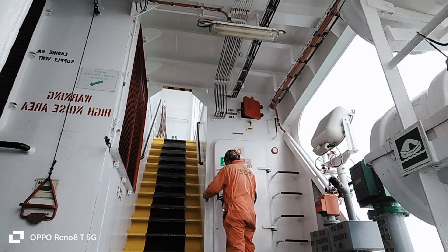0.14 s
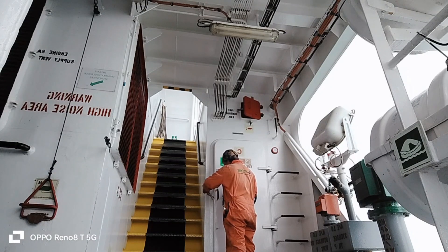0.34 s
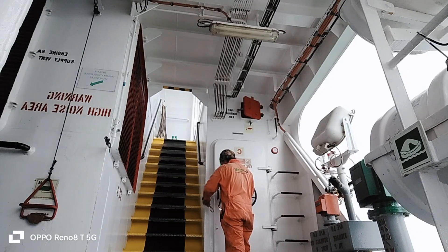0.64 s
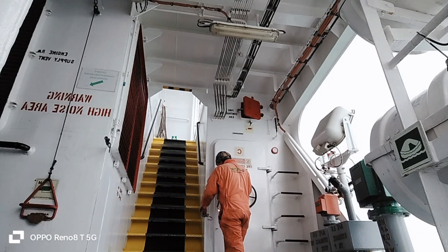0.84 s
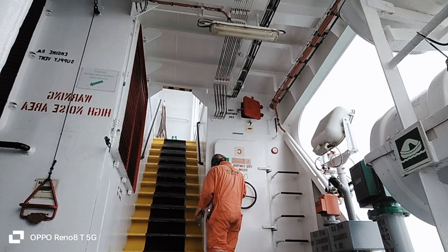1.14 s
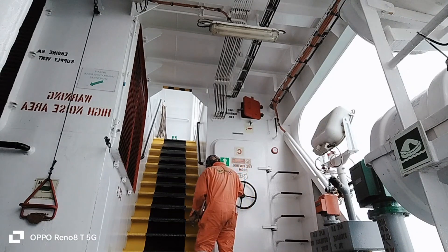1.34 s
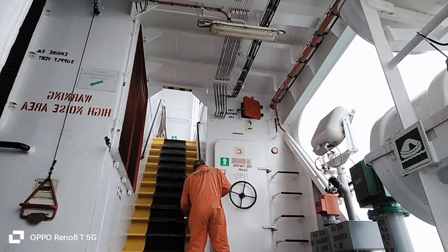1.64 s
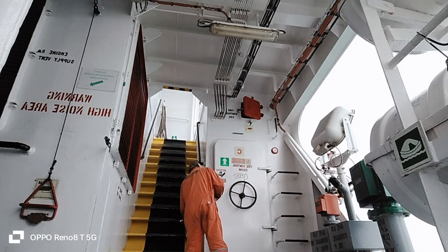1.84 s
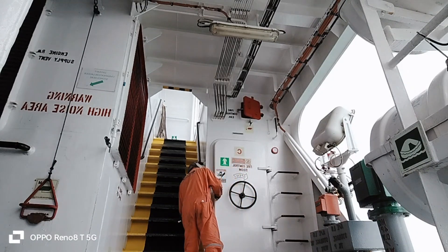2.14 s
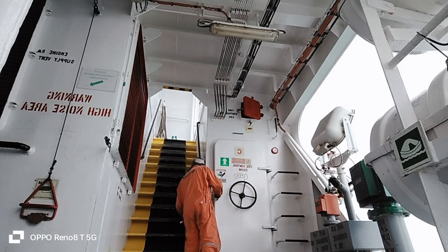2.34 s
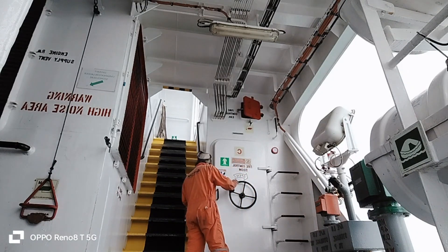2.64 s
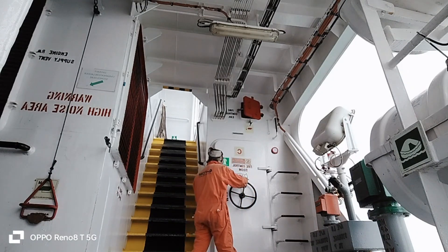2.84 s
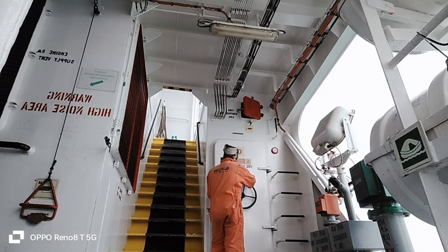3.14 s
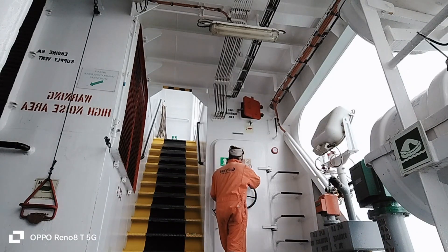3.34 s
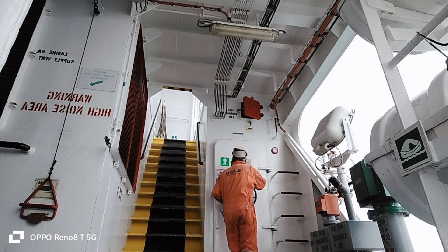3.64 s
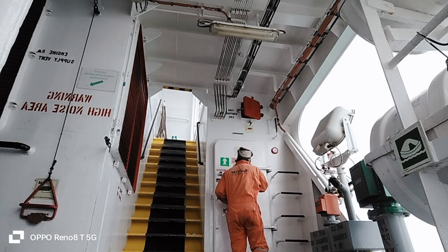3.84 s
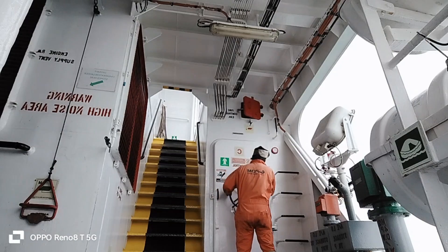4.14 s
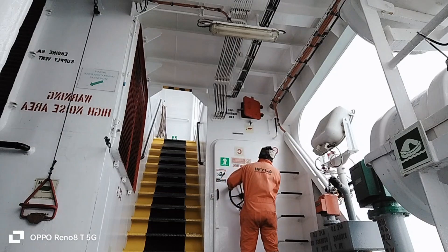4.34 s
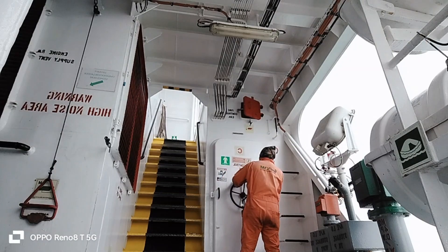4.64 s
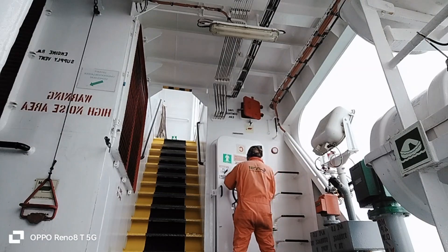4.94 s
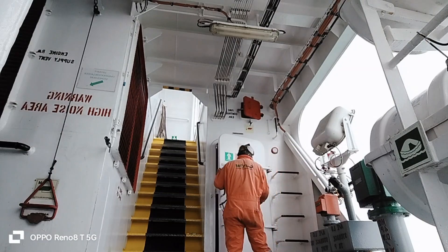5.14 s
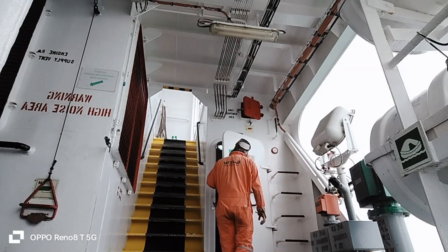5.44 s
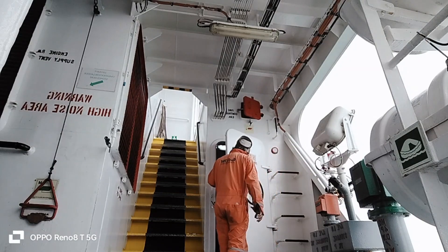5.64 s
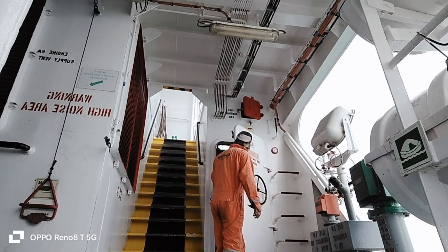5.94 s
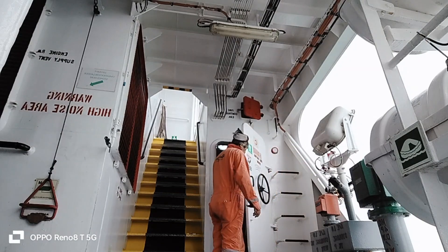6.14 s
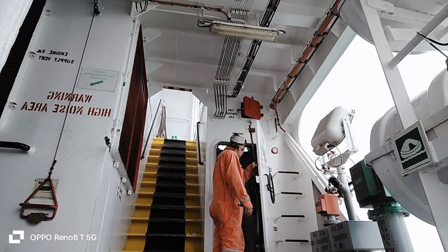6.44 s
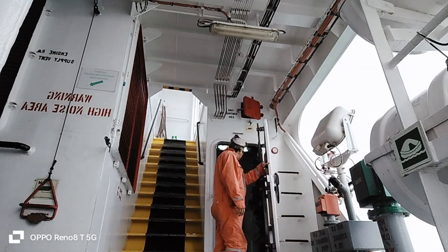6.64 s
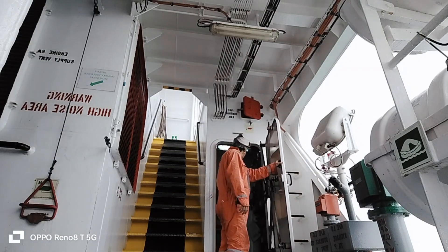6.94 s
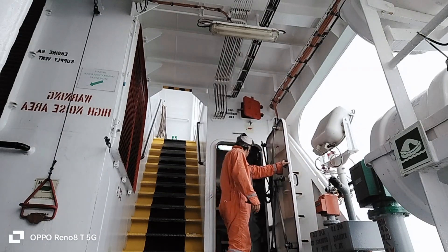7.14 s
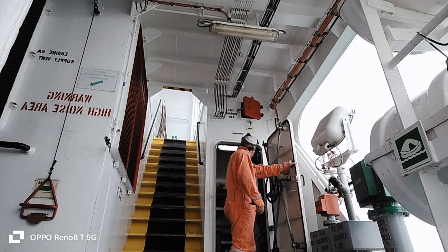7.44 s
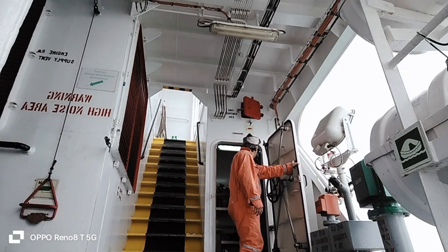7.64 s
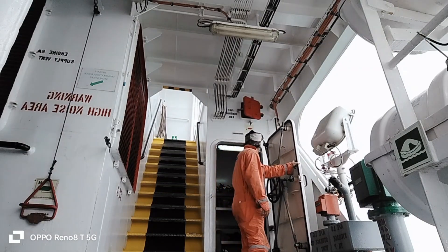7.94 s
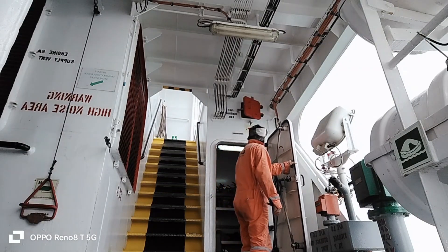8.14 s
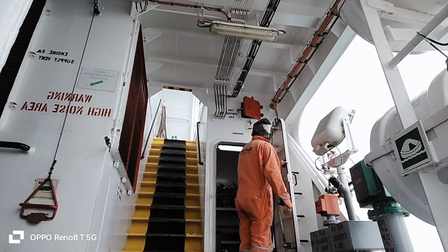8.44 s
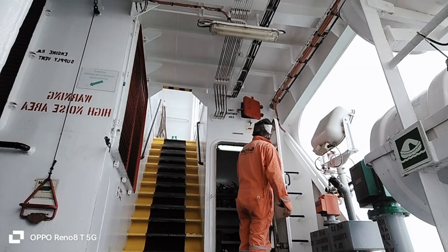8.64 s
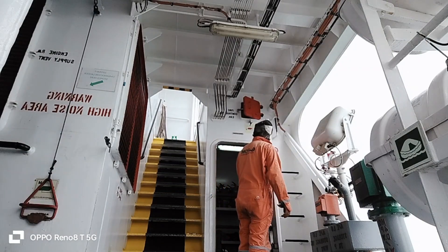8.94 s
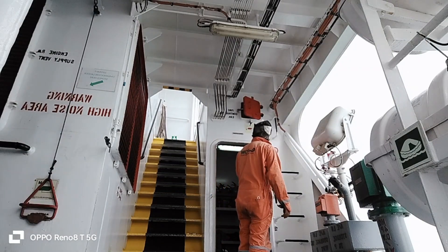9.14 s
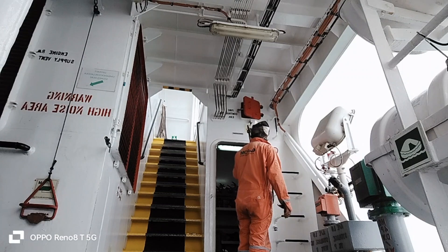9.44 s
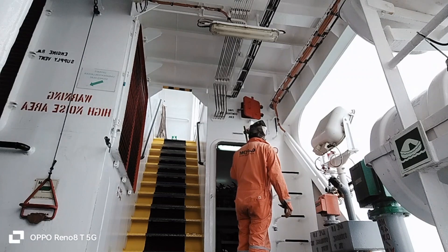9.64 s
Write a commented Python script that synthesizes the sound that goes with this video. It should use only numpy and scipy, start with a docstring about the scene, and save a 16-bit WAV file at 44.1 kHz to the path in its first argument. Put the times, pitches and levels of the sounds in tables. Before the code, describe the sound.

Low, throbbing ventilation noise fills a sheltered deck on a ship from start to finish. The hum surges unevenly several times a second over rumbling, softly ringing steel panels and hissing air. Near the middle, the wheel on a metal door clanks faintly twice in quick succession. Occasional dull bumps, like feet and door fittings, stay almost buried under the fan.

```python
"""A swelling, wavering drone with a gusty boom: a big supply fan roars on a covered steel ship deck.
Turbulence pumps the duct's lowest resonance and shakes its upper ones along. The blades hum steadily,
housing and deck rumble, casing panels ring and air rushes through the louvres. A door handwheel clanks
twice among faint bumps. A gain control leans back after each swell."""
import sys
import numpy as np
from scipy import signal
from scipy.fft import rfft, irfft, next_fast_len
from scipy.io import wavfile
from scipy.ndimage import uniform_filter1d

SR = 44100
rng = np.random.default_rng(int(sys.argv[2]) if len(sys.argv) > 2 else 0)


def transcribe(signal):
    """Save signal, clipped to [-1, 1], as a 16-bit WAV file at the path in sys.argv[1]."""
    frames = np.atleast_2d(signal).T
    limited = np.clip(frames, -1, 1)
    pcm = np.round(limited * 32767).astype(np.int16)
    wavfile.write(sys.argv[1], SR, pcm)


N = 431738


# Swells of the lowest duct resonance: (crest time [s], level [dB], pitch [Hz], rise [s], fall [s])
DRONE_SWELLS = [(0.03, -20, 124, 0.024, 0.08), (0.2, -17, 125.8, 0.075, 0.055),
                (0.41, -13.5, 122.9, 0.06, 0.052), (0.53, -27, 126.1, 0.035, 0.075),
                (0.66, -19.0, 124.4, 0.027, 0.051), (0.79, -6.5, 125.3, 0.035, 0.13),
                (0.93, -10.5, 122.3, 0.072, 0.092), (1.15, -13.5, 124.6, 0.19, 0.043),
                (1.33, -13, 124.9, 0.05, 0.13), (1.5, -12, 125.4, 0.22, 0.053),
                (1.6, -19.5, 121, 0.059, 0.045), (1.71, -22, 123.7, 0.043, 0.037),
                (1.82, -17.0, 124.7, 0.065, 0.048), (1.92, -25, 120.3, 0.044, 0.027),
                (2.03, -26, 127.6, 0.041, 0.034), (2.11, -17, 125.1, 0.032, 0.053),
                (2.28, -16.0, 121.2, 0.071, 0.11), (2.43, -15.5, 125.1, 0.068, 0.11),
                (2.76, -10.5, 125.7, 0.12, 0.097), (2.97, -23, 119, 0.025, 0.02),
                (3.13, -6.5, 123.3, 0.067, 0.036), (3.24, -10.5, 122.4, 0.047, 0.035),
                (3.38, -13, 122, 0.055, 0.054), (3.47, -12, 124.2, 0.086, 0.03),
                (3.57, -16.5, 126.5, 0.03, 0.019), (3.67, -9.5, 125.6, 0.037, 0.056),
                (3.84, -11.5, 125.1, 0.044, 0.042), (4.03, -9.5, 125.3, 0.11, 0.05),
                (4.22, -14, 128, 0.039, 0.05), (4.3, -11.5, 125.5, 0.055, 0.038),
                (4.44, -10.0, 125.6, 0.056, 0.05), (4.6, -14.5, 123.6, 0.053, 0.057),
                (4.83, -6.5, 123.2, 0.1, 0.12), (5.07, -19.5, 124.4, 0.1, 0.07),
                (5.26, -6.0, 122.9, 0.047, 0.063), (5.54, -13.5, 125.5, 0.055, 0.042),
                (5.63, -25, 127, 0.054, 0.024), (5.77, -5.5, 123.6, 0.029, 0.053),
                (5.96, -24, 117.3, 0.04, 0.067), (6.16, -10, 122, 0.12, 0.034),
                (6.27, -19.5, 125, 0.03, 0.11), (6.48, -12.5, 124.5, 0.1, 0.047),
                (6.65, -18.5, 119.8, 0.093, 0.091), (6.79, -10, 125, 0.041, 0.045),
                (6.99, -20, 125.8, 0.024, 0.04), (7.08, -5, 124.5, 0.045, 0.1),
                (7.22, -13.5, 124.5, 0.054, 0.068), (7.53, -16, 125.8, 0.17, 0.085),
                (7.869, -8.5, 122.5, 0.085, 0.063), (8.19, -17, 122.3, 0.211, 0.076),
                (8.39, -11, 123.8, 0.067, 0.11), (8.71, -17, 124.6, 0.15, 0.125),
                (8.93, -9.5, 124.6, 0.063, 0.07), (9.22, -12, 126.1, 0.085, 0.065),
                (9.34, -17, 129, 0.058, 0.095), (9.54, -16, 123, 0.095, 0.19),
                (9.77, -18, 122.6, 0.055, 0.06)]

def duct_drone(lull_db=-33, waver_db=6, wobble_hz=0.61):
    """Turbulence pumps a narrow resonance: one restless sine. Also returns its level about the mean."""
    swells = [(s, db, rise_s, fall_s) for s, db, _, rise_s, fall_s in DRONE_SWELLS]
    level_db = crests(swells, lull_db + waver_db * drift(13.0), roundness=1.9, turn_rad=1.85)
    pitch_hz = in_time([(s, hz) for s, _, hz, _, _ in DRONE_SWELLS]) + wobble_hz * drift(6.1)
    tone = np.sqrt(2) * np.sin(2 * np.pi * np.cumsum(pitch_hz) / SR)
    return from_db(level_db) * tone, level_db - level_db.mean()


# Upper duct resonances: (centre [Hz], width [Hz], relative level [dB])
DUCT_MODES = [(239, 23, -1), (268.4, 25.3, -1.5), (288.4, 37, -12)]
# Strong gusts in the duct: (crest time [s], level [dB])
DUCT_GUSTS = [(0.19, -21), (0.31, -18), (0.39, -20.5), (0.79, -14), (0.93, -22.5), (1.36, -20.5),
              (1.44, -29), (2.09, -20.5), (2.18, -21.5), (2.5, -24.5), (2.71, -18.5), (3.14, -16),
              (3.47, -16), (4.01, -14.5), (4.22, -16.5), (4.29, -17.5), (4.43, -12.5), (4.85, -21.5),
              (5.27, -16.5), (5.53, -23.5), (5.77, -20.5), (5.83, -21.5), (6.16, -17), (6.48, -11),
              (7.08, -14.5), (7.42, -24), (7.51, -18.5), (8.11, -19), (9.08, -22.5), (9.34, -21.5),
              (9.62, -21)]

def duct_boom(swell_db, lull_db=-29.5, waver_db=3, rise_s=0.026, fall_s=0.032):
    """Gusts shake the upper duct resonances. Also returns the boom's level about the mean."""
    bed_db = lull_db + 0.13 * swell_db + waver_db * drift(6.4)
    gusts = [(s, db, rise_s, fall_s) for s, db in DUCT_GUSTS]
    level_db = crests(gusts, bed_db, roundness=0.88, turn_rad=np.pi / 2)
    ring = sum(from_db(db) * band(rng.standard_normal(N), hz, width) for hz, width, db in DUCT_MODES)
    flutter = np.sqrt(uniform_filter1d(rms_one(ring) ** 2, size=1500) + 0.061)
    evened = rms_one(ring / flutter ** 0.66)  # gusts outweigh the noise's own flutter
    return from_db(level_db) * evened, level_db - level_db.mean()


# Housing rumble spectrum: (frequency [Hz], relative density [dB])
HOUSING_SPECTRUM = [(60, -42), (90, -18.5), (105, -6.5), (150, 4), (160, -2.5), (175, -4), (195, -9),
                    (300, -6.5), (410, -11.5), (440, -23), (600, -21.5), (800, -31)]

def housing_rumble(swell_db, gust_db, level_db=-25):
    """The housing rumbles, partly following swells and gusts."""
    return from_db(level_db + 0.17 * swell_db + 0.29 * gust_db) * coloured(HOUSING_SPECTRUM)


# Blade tones: (frequency [Hz], rms level [dB], waver [dB])
BLADE_TONES = [(178.4, -33, 2), (355, -40, 2)]

def blade_hum():
    """The shaft turns evenly; each tone wavers a little in level."""
    t = np.arange(N) / SR
    return sum(np.sqrt(2) * from_db(db + waver_db * drift(1.9))
               * np.sin(2 * np.pi * (hz * t + rng.random())) for hz, db, waver_db in BLADE_TONES)


# Louvre rush spectrum: (frequency [Hz], relative density [dB])
LOUVRE_SPECTRUM = [(290, -7), (500, 0), (610, -5), (860, -5), (1240, -2), (1630, -6.5), (3250, -14),
                   (4150, -12.5), (5530, -19), (6670, -15), (7810, -23.5), (11000, -29.5), (14500, -37),
                   (16500, -37)]
# Slow rise and fall of the rush: (time [s], level [dB])
LOUVRE_LEVELS = [(0.0, -31.5), (0.74, -30), (1.2, -32.5), (3.68, -31.5), (4.03, -32), (4.42, -31),
                 (5.37, -33), (6.81, -31), (7.23, -33), (7.6, -31.5), (8.92, -32.5), (9.79, -32)]

def louvre_rush(flicker_db=0.45):
    """Air rushes through the louvres as broad, slightly flickering noise."""
    return from_db(in_time(LOUVRE_LEVELS) + flicker_db * drift(14.0)) * coloured(LOUVRE_SPECTRUM)


# Steel casing resonances: (centre [Hz], width [Hz], base rms level [dB])
PANEL_MODES = [(169.5, 10, -36), (212.4, 29, -43), (330.3, 10.5, -39.5), (396.2, 8.8, -39.5),
               (407.6, 18, -42.5), (457, 14.4, -43), (574, 43, -47), (664, 10, -49), (717, 18, -46),
               (1091, 68, -43), (1240, 84, -47), (1414, 33, -58), (789, 61, -50.5), (894, 49, -53.5)]

def casing_panels(gust_db):
    """Each panel rings on its own share of the turbulence, a little louder in gusts."""
    ring = sum(from_db(db) * rms_one(resonance(rng.standard_normal(N), hz, width))
               for hz, width, db in PANEL_MODES)
    return from_db(0.15 * gust_db) * ring


# Deck plate spectrum: (frequency [Hz], relative density [dB])
DECK_SPECTRUM = [(18, -12), (30, 1), (40, 2), (52, -7), (63, -4.5), (75, -4), (100, 1.5), (130, -23)]

def deck_plates(swell_db, gust_db, level_db=-37.5):
    """The duct shakes the deck plates into a deep rumble."""
    return from_db(level_db + 0.4 * swell_db + 0.17 * gust_db) * coloured(DECK_SPECTRUM)


# Handwheel clanks: (onset [s], drive level [dB], rattle rise [s])
WHEEL_CLANKS = [(4.401, -45.5, 0.005), (4.425, -48, 0.0042)]
# Handwheel modes: (frequency [Hz], gain [dB], t60 [s])
WHEEL_MODES = [(1600, -13, .012), (2100, -4, .015), (2550, -3.5, 0.019), (2760, -6, 0.026),
               (2930, -3, 0.023), (3300, -10, 0.017), (5170, -10, .008), (8000, -12, .004),
               (11500, -21, .003)]

def handwheel():
    """Each clank is a short rattle of contacts that rings the wheel's modes."""
    envelope = sum(from_db(db) * burst(s, rise_s) for s, db, rise_s in WHEEL_CLANKS)
    rattle = envelope * rng.standard_normal(N) + 1e-18
    ring = 0
    for hz, db, t60_s in WHEEL_MODES:
        r, w = from_db(-60 / (t60_s * SR)), 2 * np.pi * hz / SR
        ring += signal.lfilter([0, from_db(db) * np.sin(w)], [1, -2 * r * np.cos(w), r * r], rattle)
    return ring


# Dull bumps and rubs: (onset [s], level [dB], rise [s], centre [Hz], width [Hz])
BUMPS = [(0.533, -30, .012, 550, 300), (0.76, -35, 0.011, 1900, 1200), (4.04, -30, 0.012, 410.3, 149.6),
         (4.197, -34, 0.011, 397, 249), (4.291, -33, 0.012, 397, 250), (4.4, -33, .012, 430, 300),
         (4.66, -40.5, .02, 1890, 900), (4.705, -36, 0.0055, 1716, 1200), (6.456, -32, 0.013, 600, 499),
         (8.101, -35, .010, 420, 300.7), (9.071, -29, .015, 520, 301)]

def bumps():
    """Brief rubs, likely feet and door gear: bursts of broad band noise."""
    rub = rng.standard_normal(N)
    return sum(from_db(db) * burst(s, rise_s) * band(rub, hz, width)
               for s, db, rise_s, hz, width in BUMPS)


def crests(rows, bed_db, roundness, turn_rad):
    """Level [dB] of crests over a bed; rise and fall each span 10 dB. Roundness 1 is pointed, 2 round."""
    t = np.arange(0, N + 40, 40) / SR
    crest_s, db, rise_s, fall_s = np.transpose(rows)[:, :, None]
    distance = np.abs(t - crest_s) / np.where(t < crest_s, rise_s, fall_s)
    heights = from_db(db - 10 * distance ** roundness)
    phasors = np.exp(1j * turn_rad * np.arange(len(rows)))  # out of step: overlaps can partly cancel
    power = np.abs(phasors @ heights) ** 2
    return 10 * np.log10(np.interp(np.arange(N) / SR, t, power) + from_db(bed_db) ** 2)


def burst(onset_s, rise_s):
    """Quick rise to 1, slower fall."""
    age = np.maximum(np.arange(N) / SR - onset_s, 0) / rise_s
    return age * np.exp(1 - age)


def in_time(rows):
    """(time [s], value) rows joined by straight lines."""
    return np.interp(np.arange(N) / SR, *np.transpose(rows))


def drift(rate_hz):
    """Slow random wander, rms 1: noise through two one-pole low-passes."""
    step, run_in = 40, 2000
    r = np.exp(-2 * np.pi * rate_hz * step / SR)
    noise = rng.standard_normal(N // step + run_in + 2)
    slow = signal.lfilter([1], [1, -2 * r, r * r], noise)[run_in:]
    return np.interp(np.arange(N) / step, np.arange(len(slow)), rms_one(slow))


def coloured(spectrum):
    """Noise with the given spectrum, rms 1."""
    size = next_fast_len(N)
    hz, db = np.transpose(spectrum)
    bin_hz = np.arange(1, size // 2 + 2) * SR / size
    bin_db = np.interp(np.log(bin_hz), np.log(hz), db, left=-99, right=-99)
    return rms_one(irfft(rfft(rng.standard_normal(size)) * from_db(bin_db), size)[:N])


def resonance(x, hz, width_hz):
    """Two-pole peak, gain 1."""
    r, w = np.exp(-np.pi * width_hz / SR), 2 * np.pi * hz / SR
    return signal.lfilter([(1 - r * r) / 2, 0, (r * r - 1) / 2], [1, -2 * r * np.cos(w), r * r], x)


def band(x, hz, width_hz):
    """Twice through one resonance, rms 1."""
    return rms_one(resonance(resonance(x, hz, width_hz), hz, width_hz))


def from_db(db):
    """Level to gain."""
    return 10 ** (np.asarray(db) / 20)


def rms_one(x):
    """Scale to rms 1."""
    return x / np.sqrt(np.mean(x ** 2) + 1e-20)


def scene():
    """Mono mix; the duct's swells and gusts also move housing, panels and deck."""
    drone, swell_db = duct_drone()
    boom, gust_db = duct_boom(swell_db)
    steel = housing_rumble(swell_db, gust_db) + casing_panels(gust_db) + deck_plates(swell_db, gust_db)
    return (drone + boom + steel + blade_hum() + louvre_rush() + handwheel() + bumps())[None]


def record(dry):
    """Gain control drops fast on a swell and recovers slowly; peaks are rounded, the top is cut."""
    attack_s, release_db_per_s = 0.064, 10 / 0.76
    neutral_db, cut_db_per_db = -13.5, 0.068
    ceiling, cutoff_hz = 7.8, 15730
    r = np.exp(-1 / (attack_s * SR))
    level_db = 10 * np.log10(signal.lfilter([1 - r], [1, -r], dry[0] ** 2) + 1e-5)
    release_db = release_db_per_s * np.arange(N) / SR
    held_db = np.maximum.accumulate(level_db + release_db) - release_db
    excess_db, _ = signal.lfilter([1 - r], [1, -r], held_db - neutral_db, zi=[-8.0])
    levelled = from_db(-cut_db_per_db * excess_db) * dry
    rounded = ceiling * np.tanh(levelled / ceiling)
    return signal.sosfilt(signal.ellip(14, 0.5, 70, cutoff_hz, fs=SR, output="sos"), rounded)


dry = scene()
out = record(dry)
transcribe(out)
```